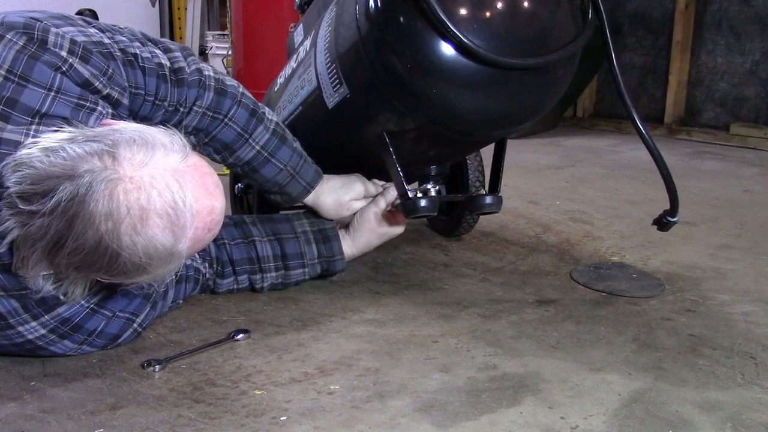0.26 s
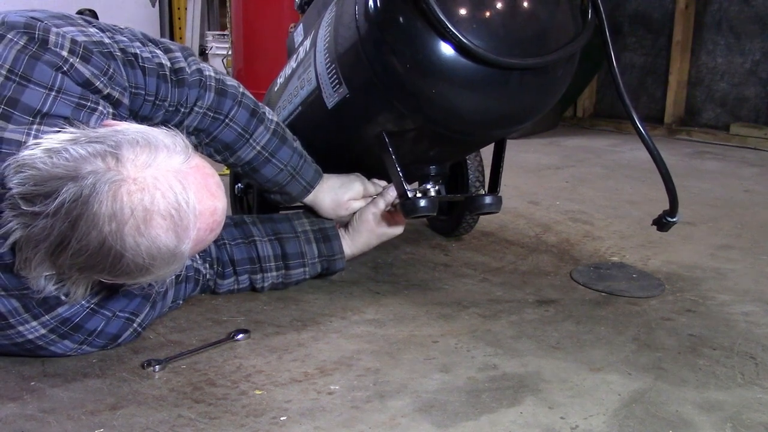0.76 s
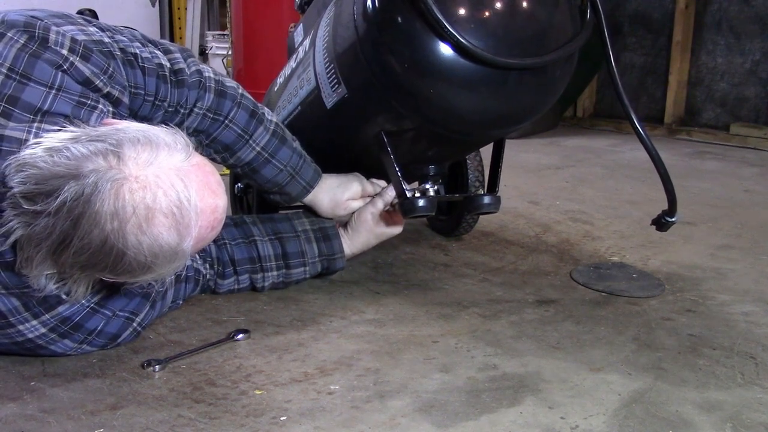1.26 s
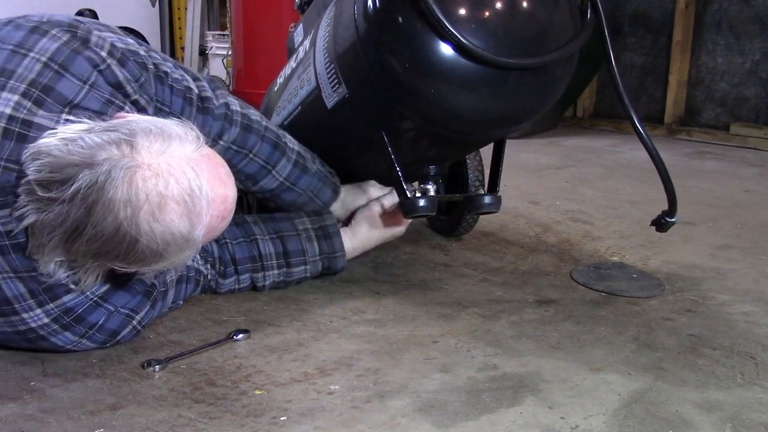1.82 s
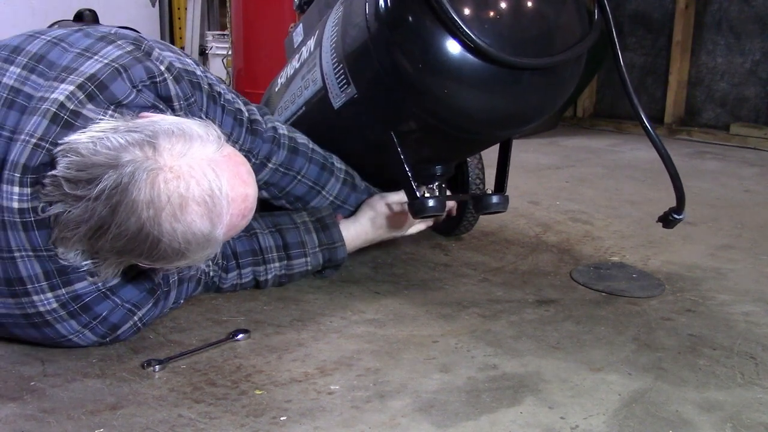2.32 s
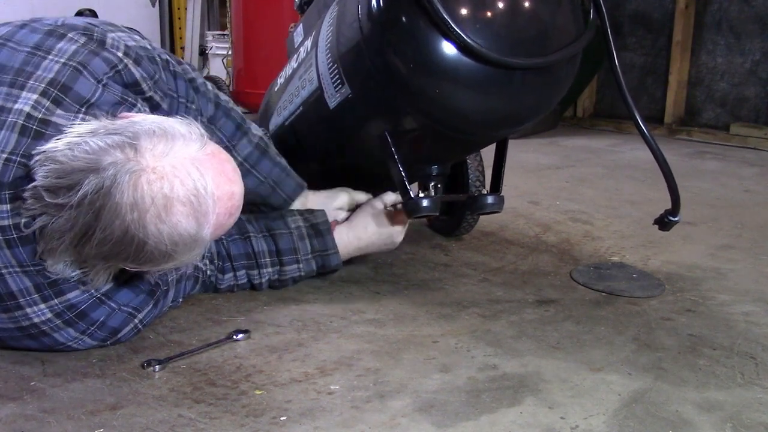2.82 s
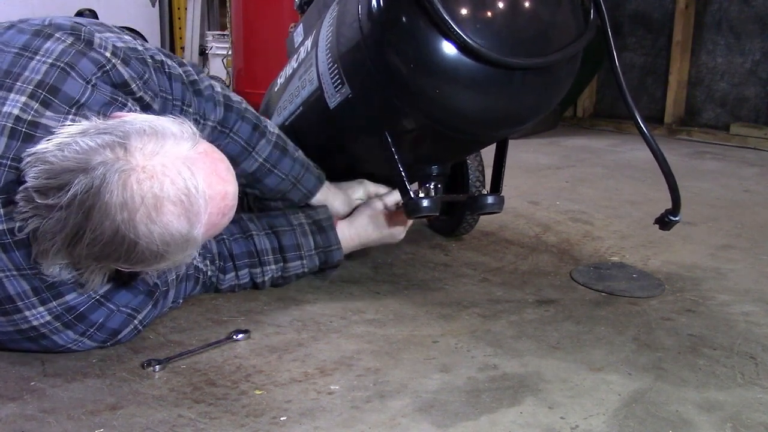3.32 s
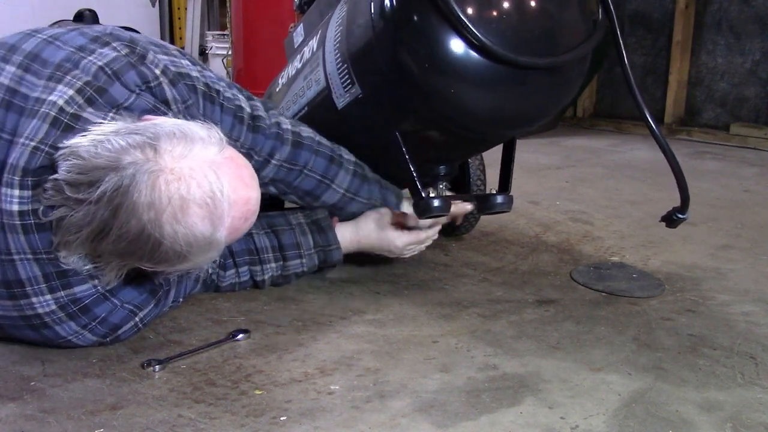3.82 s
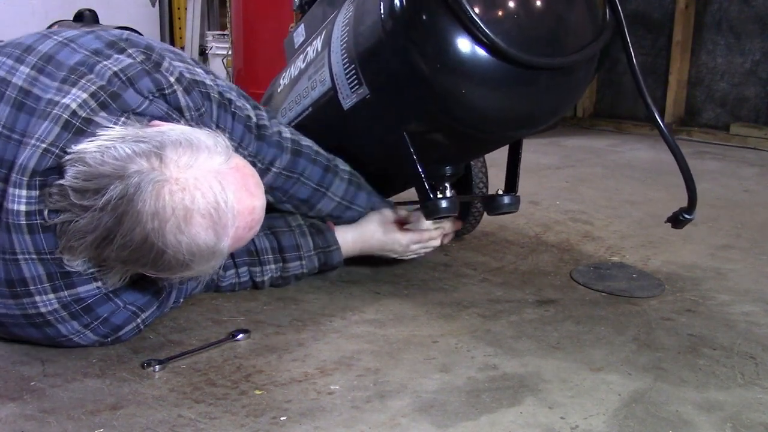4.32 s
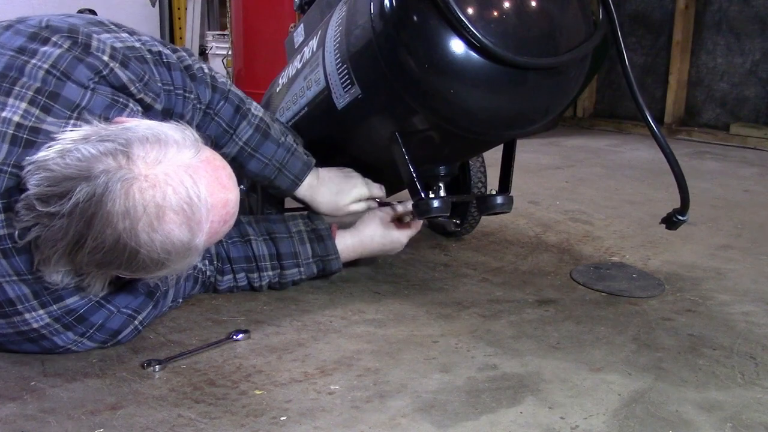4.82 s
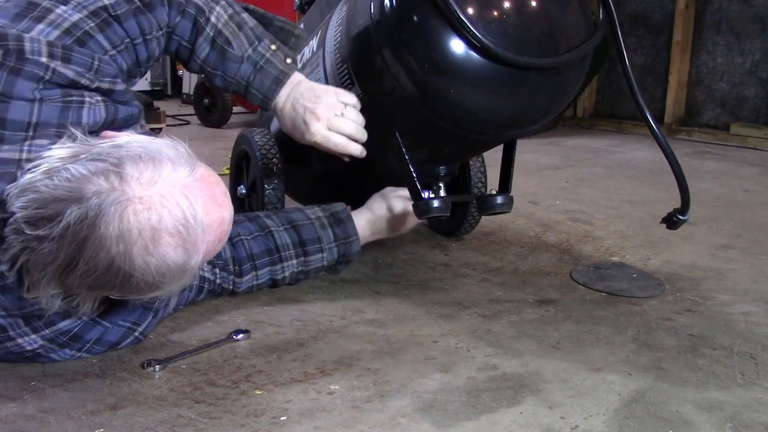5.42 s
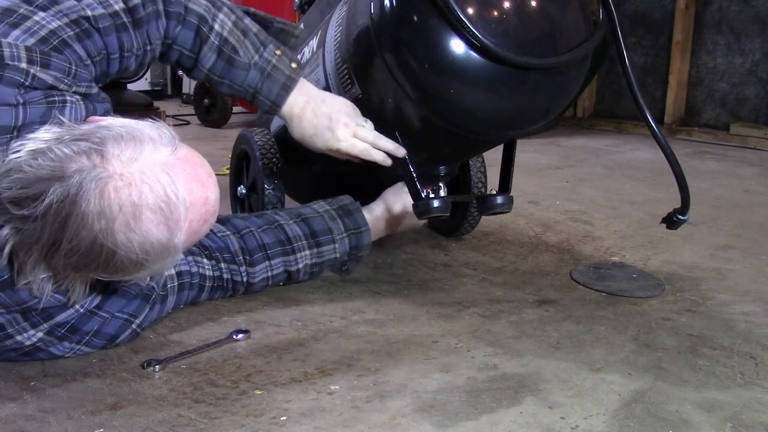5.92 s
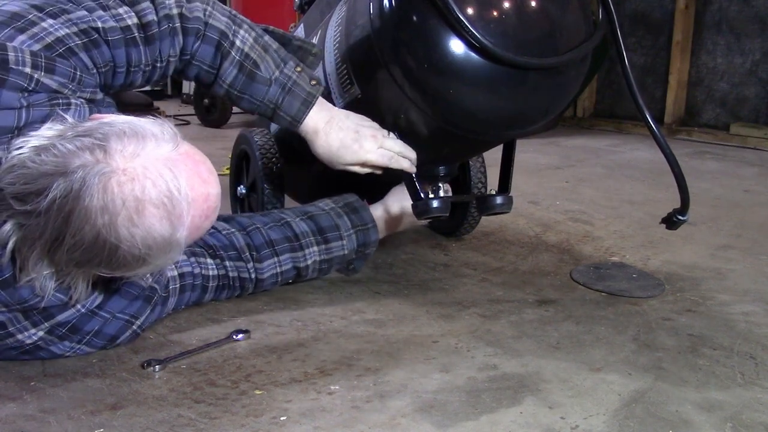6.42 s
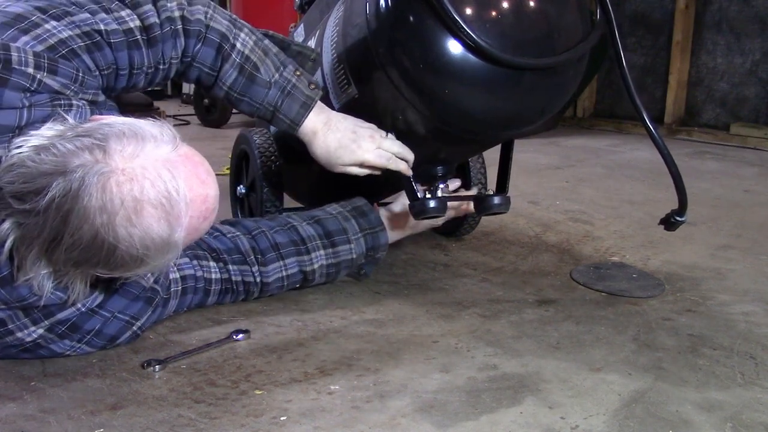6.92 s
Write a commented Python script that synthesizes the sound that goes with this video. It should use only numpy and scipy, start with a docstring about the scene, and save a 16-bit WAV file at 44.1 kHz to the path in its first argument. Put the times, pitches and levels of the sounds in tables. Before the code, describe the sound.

A sharp pressurised hiss with a low rush and thin high whistle weakens as the tank empties. Steel contacts on the valve then begin, hard and clangy, each briefly exciting the hollow shell. A stiff fitting squeaks twice. After a pause around five seconds, cloth brushes softly and irregular metal taps resume. Close microphone, dry workshop with a short echo, quiet room tone and faint hum.

```python
"""Air hisses from the drain valve under a steel tank and dies away as the pressure falls, over a faint hum.
The hiss is coloured noise with a lip tone and a gliding whistle; room tone and two sines lie beneath it.
Soft noise swells, mostly sleeve strokes, rustle while someone on the workshop floor works at the fitting.
The stiff valve squeals on a note of the shell. Steel clanks as decaying noise bursts, and the modes of
the tank and valve ring on as damped sines."""
import sys
import numpy as np
from scipy import signal
from scipy.fft import rfft, irfft, next_fast_len
from scipy.io import wavfile
from scipy.ndimage import map_coordinates

SR = 44100
rng = np.random.default_rng(int(sys.argv[2]) if len(sys.argv) > 2 else 0)


def bounce(signal):
    """Save signal as a 16-bit WAV file at the path given by the first command-line argument."""
    frames = np.transpose(np.atleast_2d(signal))
    limited = np.clip(frames, -1, 1)
    pcm = np.round(limited * 32767).astype(np.int16)
    wavfile.write(sys.argv[1], SR, pcm)


N = 315756
TIME = np.arange(N) / SR
PING_HZ = 1003  # the shell's clearest note

# stereo spread of the air: f/Hz, side against mid level/dB
AIR_SPREAD = [(60, -9), (290, -20.5), (2500, -39.5), (7000, -18), (14000, -5)]


def amp(db):
    """Logarithmic level: decibels become an amplitude gain."""
    return np.exp(np.asarray(db) * np.log(10) / 20)


def unit(x):
    """Power normalisation: the signal is scaled to rms 1."""
    return x / np.sqrt(np.mean(x ** 2) + 1e-20)


def along(points, hz):
    """Logarithmic pitch scale: (f/Hz, value) points are interpolated on a log axis."""
    f, v = np.transpose(points)
    return np.interp(np.log(hz + 1), np.log(f + 1), v)


def curve(points, axis=1):
    """Linear interpolation: one column of a table against time, one value per sample."""
    columns = np.transpose(points)
    return np.interp(TIME, columns[0], columns[axis])


def wobble(rate):
    """Slow random modulation: a smooth curve through random knots, rate knots a second."""
    knots = rng.standard_normal(int(N * rate / SR) + 4)
    return map_coordinates(knots, [TIME * rate], mode="nearest")


def shape(points, shift=1):
    """Spectral envelope: gain of (f/Hz, level/dB) points scaled in pitch, falling below the first point."""
    return lambda hz: amp(along(points, hz / shift)) * np.minimum(hz / shift / points[0][0], 1)


def resonances(rows):
    """Resonance: the summed gain of peaks with steep skirts, one per (f/Hz, width/Hz, level/dB) row."""
    return lambda hz: sum(amp(db) / (1 + ((hz - centre) / width) ** 2 * 2) for centre, width, db in rows)


def ripple(step_hz, depth_db):
    """Spectral colouration: a random gain along frequency, with a new knot every step_hz."""
    knots = np.random.default_rng(rng.integers(2 ** 31)).uniform(-1, 1, size=2048)
    return lambda hz: amp(depth_db * np.interp(hz / step_hz, np.arange(len(knots)), knots))


def noise(*gains, spread=None, size=N):
    """Linear filtering: white mid and side noise takes each gain in turn, giving stereo of rms 1."""
    # default stereo spread, for all but the air and thumps: f/Hz, side against mid level/dB
    near_spread = [(40, 9), (300, -22.5), (4000, -19), (8000, -16.5), (14000, -44.5)]
    if spread is None:
        spread = near_spread
    m = next_fast_len(size)
    hz = np.fft.rfftfreq(m, 1 / SR)
    colour = np.prod([gain(hz) for gain in gains], axis=0)
    mid_side_gain = [colour, colour * amp(along(spread, hz))]
    mid, side = irfft(rfft(rng.standard_normal((2, m))) * mid_side_gain, m)[:, :size]
    return unit(np.array([mid + side, mid - side]))


def gliding(pitch_hz, width_hz):
    """Frequency shifting: the analytic signal of a noise band is turned so its centre follows a pitch."""
    centre = np.mean(pitch_hz)
    source = noise(resonances([(centre, width_hz, 0)]), spread=AIR_SPREAD)
    band = signal.hilbert(source, next_fast_len(N))[:, :N]
    return np.real(band * np.exp(2j * np.pi * np.cumsum(pitch_hz - centre) / SR))


def air():
    """Jet turbulence sounds the valve's lip and bore; the highest band fades fastest as the tank empties."""
    # broad low rush: f/Hz, level/dB
    rush_spectrum = [(45, -70), (125, -16), (240, -2.5), (410, 2), (980, -1.5), (1300, -6.5), (2400, -5),
                     (5000, -34.5)]
    # hiss of the jet: f/Hz, level/dB
    jet_spectrum = [(1500, -30), (3300, -3), (4550, 1.5), (5050, -8), (5500, -14.5), (7000, -9.5),
                    (8600, -18.5), (11000, -30)]
    # tone of the jet on the valve's lip: t/s, f/Hz
    lip_pitch = [(0, 4813), (.55, 4697), (1.3, 4305), (2, 4536)]
    # whistle of the bore: t/s, f/Hz before wobble, level/dB over its share of the flow
    whistle_track = [(0, 7690, -1.5), (.7, 7560, -1), (.86, 7720, 0), (1.18, 7650, 4), (1.4, 7550, 1),
                     (1.75, 7640, -2.5), (1.98, 7710, 2), (2.45, 7540, 1.5), (3.4, 7615, 0.5)]
    # overtones of the bore: f/Hz, width/Hz, level/dB
    bore_overtones = [(10430, 660, 4.5), (12500, 900, 0.5), (14000, 1900, -18)]
    # the flow sinks steadily, then faster once the tank is nearly empty
    fall_db_per_s, nearly_empty_s, last_fall_db_per_s = 6.5, 2.33, 19.5
    choked_db = -4.5  # down to this flow the outlet is choked and the low rush holds steady
    # base level (dB), and dB lost for each dB of flow
    rush_db, rush_follows = -31.5, 0.88
    jet_base_db, jet_follows = -23.5, 0.99
    fizz_db, fizz_follows = -26.5, 1.63
    whistle_db, whistle_follows = -27.5, 1.2
    lip_db, lip_width_hz = -8, 185  # level against the jet

    early_fall_db = fall_db_per_s * np.minimum(TIME, nearly_empty_s)
    late_fall_db = last_fall_db_per_s * np.maximum(TIME - nearly_empty_s, 0)
    flow_db = -early_fall_db - late_fall_db
    jet_db = jet_base_db + jet_follows * flow_db
    drive_db = whistle_follows * flow_db + curve(whistle_track, axis=2)
    # reflections from the floor and the tank's belly colour the hiss, drawn as a random ripple
    comb = ripple(step_hz=25.12, depth_db=6)
    rush_level = amp(rush_db + rush_follows * np.minimum(flow_db, choked_db))
    rush = rush_level * noise(shape(rush_spectrum), comb, spread=AIR_SPREAD)
    jet = amp(jet_db) * noise(shape(jet_spectrum), comb, spread=AIR_SPREAD)
    lip = amp(jet_db + lip_db) * gliding(curve(lip_pitch), width_hz=lip_width_hz)
    whistle_hz = curve(whistle_track) + 30 * wobble(6.0)
    whistle = amp(whistle_db + drive_db + 0.58 * wobble(13)) * gliding(whistle_hz, width_hz=370)
    fizz_level = amp(fizz_db + fizz_follows * flow_db + 0.58 * wobble(13.0))
    fizz = fizz_level * noise(resonances(bore_overtones), comb, spread=AIR_SPREAD)
    return rush + jet + lip + whistle + fizz


def workshop():
    """Steady background: coloured noise for still air, and hum sines modulated in level and phase."""
    # still air: f/Hz, level/dB
    room_tone = [(25, -21), (90, -13), (125, -3.5), (320, 3.5), (3000, -9), (8000, -18), (16000, -31.5)]
    # hum: f/Hz, rms level/dB about which each sine wanders
    hum_lines = [(120, -71.5), (361, -67)]
    hum = sum(amp(db + wobble(1.7)) * np.sqrt(2) * np.sin(2 * np.pi * hz * TIME + .5 * wobble(1.2))
              for hz, db in hum_lines)
    return amp(-53.5) * noise(shape(room_tone)) + hum


def soft_swells():
    """Amplitude modulation: noise swells and fades, mostly for the sliding friction of sleeves."""
    # soft noise swells, mostly sleeve strokes; the faint low one at 4.9 s stands for the shell's ringing:
    # loudest moment t/s, half length/s, body level/dB, swish level/dB
    swell_rows = [(2.589, 0.1, -41, -65), (2.95, 0.28, -45, -68), (4.06, 0.25, -64, -63.5),
                  (4.9, 0.24, -64, -77), (5.16, .025, -67, -62), (5.419, 0.061, -38, -47),
                  (5.67, 0.16, -53, -60), (5.884, 0.043, -48.5, -49), (6.02, 0.12, -45.5, -47.5),
                  (6.248, 0.098, -45, -47), (6.635, 0.1, -50, -52.5), (7, 0.44, -56, -71)]
    # body of the swells: f/Hz, level/dB
    body_spectrum = [(55, -52), (170, 3), (400, 5), (2500, -5), (9000, -31)]
    # treble of the swells: f/Hz, level/dB
    swish_spectrum = [(1500, -2), (3500, 4), (11000, -2), (16000, -19)]
    body, swish = sum(amp([[body_db], [swish_db]]) * np.exp(-((TIME - s) / half) ** 2)
                      for s, half, body_db, swish_db in swell_rows)
    unevenness = amp(1.5 * wobble(60) + 1.3 * wobble(11))
    return unevenness * (body * noise(shape(body_spectrum)) + swish * noise(shape(swish_spectrum)))


def ringing(hz, t):
    """Modal vibration: one sine per mode, its phase a random walk that stands for the room's echoes."""
    walk = np.cumsum(rng.standard_normal((len(hz), len(t)), dtype=np.float32), axis=1) / np.sqrt(SR)
    cycles = hz[:, None] * t + rng.random((len(hz), 1))
    return np.sin((2 * np.pi * cycles + 4.96 * walk).astype(np.float32))


def stroke(start, length, rise, t60):
    """Sustained excitation: a level that rises up to its start, holds for its length and decays."""
    return np.clip((TIME - start) / rise + 1, 0, 1) * amp(-60 * np.maximum(TIME - start - length, 0) / t60)


def squeals():
    """Stick-slip friction: the stiff valve sings on the shell's note as it turns."""
    # squeals of the valve: start of the hold t/s, hold/s, level/dB
    squeal_rows = [(2.61, 0.036, -29), (4.442, 0.021, -25)]
    rise_s, t60_s = 0.1, 0.34
    level = sum(amp(db) * stroke(s, length, rise_s, t60_s) for s, length, db in squeal_rows)
    return level * unit(ringing(np.array([PING_HZ]), TIME))


def fade(t, t60, echo_db, echo_t60):
    """Two-stage decay: the steel dies quickly, the workshop's echo more slowly."""
    return np.hypot(amp(-60 * t / t60), amp(echo_db - 60 * t / echo_t60))


def clanks():
    """Impact excitation: each contact gives a tick, clang, edge and knock, and leaves the modes ringing."""
    # steel on the valve and the tank's foot: t/s, blow level/dB, relative knock level/dB,
    # relative edge level/dB, relative tick level/dB, clang centre f/Hz, edge centre f/Hz
    contacts = [(2.567, -15, -36, 0.5, -36, 2350, 4500), (2.585, -9, -17, -3, -26, 2240, 4630),
                (2.801, -17, -14.5, -13, -21, 1840, 4900), (2.887, -6.5, -25, -18, -20.5, 2020, 5170),
                (2.953, -11.5, -19, -8.5, -27.5, 1580, 5300), (3.010, -2.5, -30.5, -5.5, -16.5, 2275, 4970),
                (3.044, -15.5, -27, -6.5, -17, 2300, 5160), (3.173, -17, -14.5, -9, -31, 2100, 5000),
                (3.203, -21, -9, -15, -28, 2000, 4800), (3.410, 0, -32, -6, -31, 1970, 4220),
                (3.45, -5.5, -26.5, -4.5, -44, 2320, 4230), (3.522, -13, -24.5, -2.5, -39, 2050, 4620),
                (3.893, -39, -30, 2, -7.5, 2490, 4740), (4.250, -26, -11.5, -9, -24, 1790, 4600),
                (4.268, -7, -25, -13, -31.5, 2500, 5100), (4.413, -4.5, -21, -9, -24.5, 2120, 5150),
                (4.576, -11.5, -16.5, -9.5, -21, 1560, 4640), (5.451, -2, -23.5, -10.5, -30.5, 1800, 5320),
                (5.577, -14, -24.5, -4, -39, 1780, 4460), (5.666, -10.5, -27, -1.5, -45.5, 2250, 4300),
                (5.683, -8.5, -19, -9, -4.5, 1950, 4350), (5.951, 0.5, -35.5, -8.5, -45, 1980, 4070),
                (5.997, -6.5, -26, -7, -44, 2040, 4100), (6.366, -4.5, -31, -14, -45, 1770, 3580),
                (6.528, -7, -17.5, -10, -50, 1600, 4840), (6.599, -10.5, -23.5, -6, -50, 1860, 4670),
                (6.631, -9.5, -19, -18, -32.5, 2280, 4800), (6.819, -2.5, -24, -9.5, -33, 1840, 4080)]
    # modes of the tank's shell: f/Hz, level/dB before excitation, t60/s
    tank_modes = [(342, -15, .4), (459, -18, .75), (516, -11, .65), (662, -11, .45), (857, -9.5, .41),
                  (1017, -11, .55), (1338, -14, .62), (1394, -3, .3), (1618, -12, .7), (1794, 1, .28),
                  (1917, -4, .38), (2080, 0, .25), (2240, 0, .38), (2347, -1, .33), (2407, -3, .52),
                  (2508, -1, .3), (2556, -10, .85), (2778, -3, .3), (3123, -9, .6), (3304, -7, .3),
                  (3354, -12, .66), (3784, -14, .64)]
    # modes of the valve: f/Hz
    valve_modes = [4473, 4587, 4610, 4710, 5011, 5230, 5560]
    # resonances of the valve body: f/Hz, width/Hz, level/dB
    valve_body = [(5070, 370, 14.5), (7940, 160, 9.5), (8720, 81, 12.5)]
    # spectra of the low knock, middle clang, bright edge, sharp tick and deep thump: f/Hz, level/dB
    knock_spectrum = [(35, -51), (90, -29), (200, -10), (480, 3.5), (580, -11.5), (820, 4.5), (1100, 5),
                      (2500, -80)]
    clang_spectrum = [(600, -55), (1200, -6), (1800, 5.5), (2400, 6), (3400, -1), (4200, -6), (7000, -39)]
    edge_spectrum = [(3000, -30), (4250, -0.5), (4750, -4), (5300, -12), (6400, -33.5), (14000, -71)]
    tick_spectrum = [(3500, 3), (5800, 1), (10000, -10), (13000, -23), (16000, -47)]
    thump_spectrum = [(25, 5.5), (55, -4), (130, -20), (400, -69)]
    ping_db, ping_t60_s = 11.5, 0.42  # level against the knock
    thump_db, thump_grows = -60, 2  # base level, and dB gained for each dB of blow
    valve_db, valve_t60_s = -14, 0.32  # level against the edge
    peak_db, peak_width_hz = 4.5, 19.5  # gain the modes add to the noise spectra
    mode_scatter_db = 3.5  # from contact to contact
    blow_low_hz = 128  # the blows are cut away steeply below this; the thump is left whole

    size = 3 * SR // 4  # samples in a blow
    lead = SR // 50  # samples in a slip
    out, t = np.zeros((2, N + 2 * SR)), np.arange(size) / SR
    hz, level, life = np.transpose(tank_modes)
    low = hz < 1200
    low_cut = signal.butter(4, blow_low_hz, "high", fs=SR, output="sos")
    mode_fade = amp(level[:, None] - 60 * t / life[:, None])
    valve_hz, grid = np.array(valve_modes), np.arange(SR // 2)
    peaks = 2.5 + resonances([(f, peak_width_hz, peak_db) for f in [*hz, *valve_hz]])(grid)
    for s, db, knock_db, edge_db, tick_db, clang_hz, edge_hz in contacts:
        # the same strong modes stand out of every blow;
        # a random ripple, drawn anew for each blow, varies the rest of its colour
        blow_ripple = ripple(step_hz=24.03, depth_db=8.5)
        shell = lambda f: np.interp(f, grid, peaks) * blow_ripple(f)
        bright = shape(edge_spectrum, edge_hz / 4600)
        clang_noise = noise(shape(clang_spectrum, clang_hz / 2100), shell, size=size)
        clang = amp(2.0) * clang_noise * fade(t, 0.32, -20.5, 0.95)
        edge = amp(edge_db) * noise(bright, shell, size=size) * fade(t, 0.2, -9.0, 0.58)
        knock_noise = noise(shape(knock_spectrum), shell, size=size)
        knock = amp(knock_db + 11.0) * knock_noise * fade(t, 0.41, -12, 1.0)
        # the first contacts land on the valve and ring its body; the later ones snap on the tank's foot
        on_valve = s < 5
        snap = lambda f: shape(tick_spectrum)(f) + on_valve * resonances(valve_body)(f)
        tick = amp(tick_db + 15.5) * noise(snap, size=size) * fade(t, 0.036, -13.0, 0.3)
        # a strong knock drives the low modes harder; every contact meets the modes at new strengths
        drive_db = np.where(low, knock_db + 14.5, -11)
        strength = amp(drive_db + rng.normal(0, mode_scatter_db, len(hz)))
        ring = strength @ (mode_fade * ringing(hz, t))
        valve_fade = amp(edge_db + valve_db - 60 * t / valve_t60_s)
        ring += valve_fade * (bright(valve_hz) @ ringing(valve_hz, t))
        # one note of the shell swells after the contact
        ping_fade = amp(knock_db + ping_db - 60 * t / ping_t60_s)
        ping = ping_fade * ringing(np.array([PING_HZ]), t) * (1 - np.exp(-t / 0.014))
        # the shell takes a moment to fill with sound; the tick comes at once
        blow = (clang + edge + knock + ring + ping) * (1 - np.exp(-t / 0.00084)) + tick
        # the low thump weakens faster than the blow, so it matters only in the hardest
        thump_noise = noise(shape(thump_spectrum), spread=[(50, -15.5)], size=size)
        thump = amp(thump_db + thump_grows * db - 60 * t / 0.15) * thump_noise
        start = round(s * SR)
        out[:, start:][:, :size] += amp(db - 11.0) * signal.sosfilt(low_cut, blow) + thump
        # on the valve the steel slips for a moment before it catches
        slip_noise = noise(shape(clang_spectrum, clang_hz / 2300), size=lead)
        slip = on_valve * amp(db - 31.0) * np.linspace(0, 1, lead) * slip_noise
        out[:, start - lead:][:, :lead] += slip
    return out[:, :N]


def scene():
    """Linear superposition: the sources add, with the steel 0.3 dB stronger on the left."""
    steel = (clanks() + squeals()) * amp([[.15], [-.15]])
    return air() + workshop() + soft_swells() + steel


def record(dry):
    """Soft saturation rounds off the highest peaks; a band limit keeps nothing above top_hz."""
    top_hz = 15850
    rounded = dry / (1 + np.abs(dry / .95) ** 6) ** (1 / 6)
    m = next_fast_len(N + SR)
    return irfft(rfft(rounded, m) * (np.fft.rfftfreq(m, 1 / SR) < top_hz), m)[:, :N]


dry = scene()
out = record(dry)
bounce(out)
```